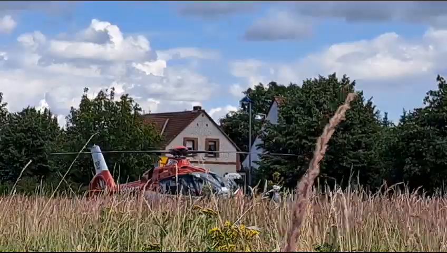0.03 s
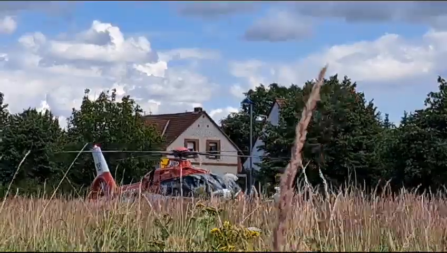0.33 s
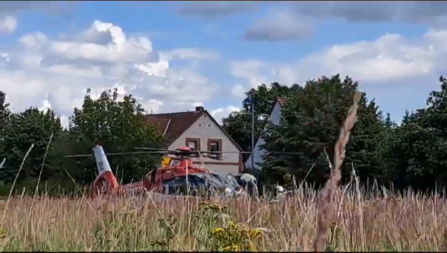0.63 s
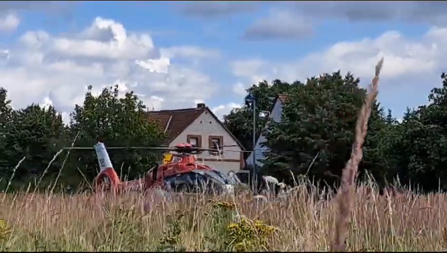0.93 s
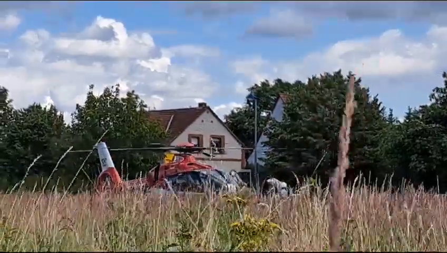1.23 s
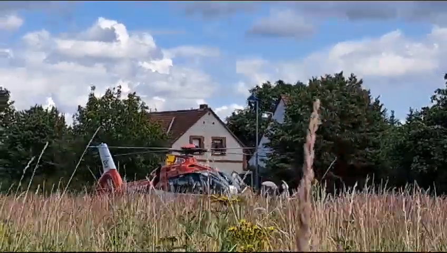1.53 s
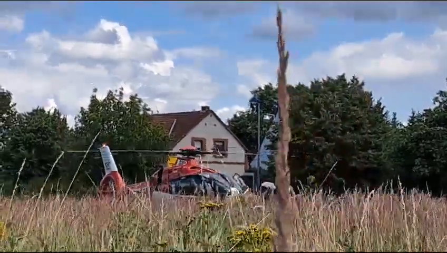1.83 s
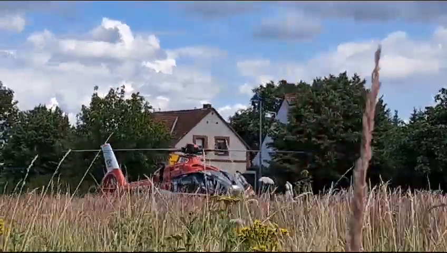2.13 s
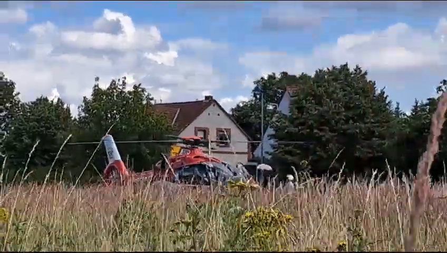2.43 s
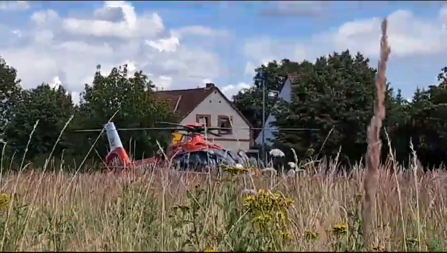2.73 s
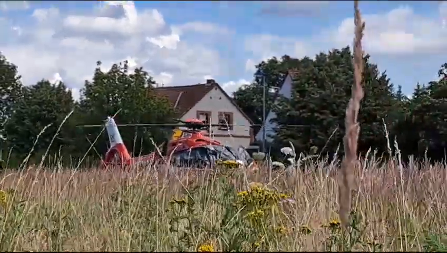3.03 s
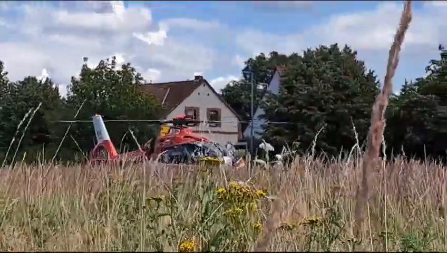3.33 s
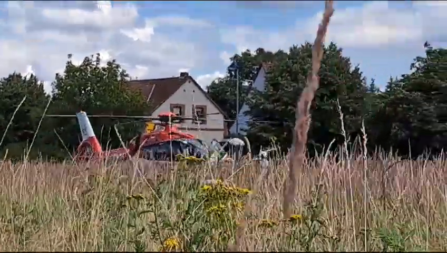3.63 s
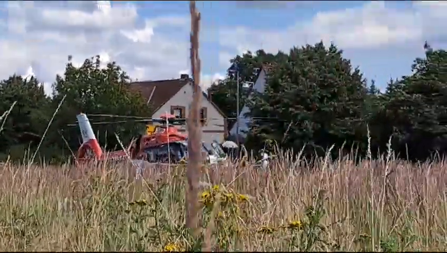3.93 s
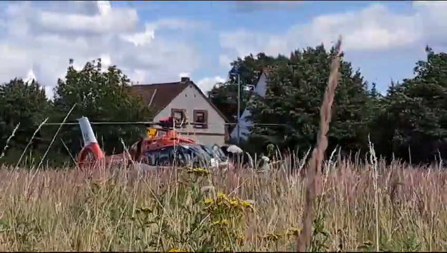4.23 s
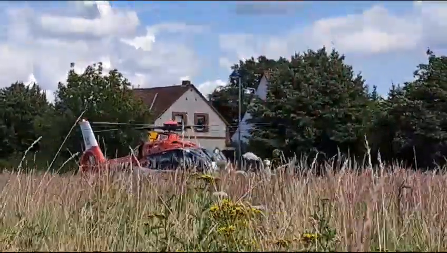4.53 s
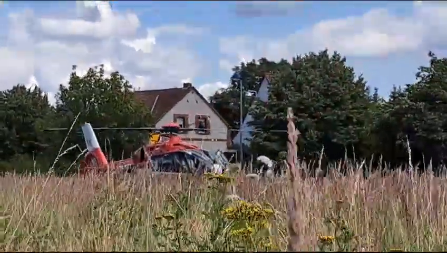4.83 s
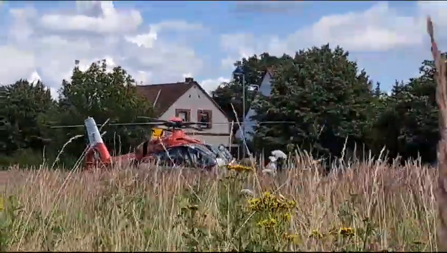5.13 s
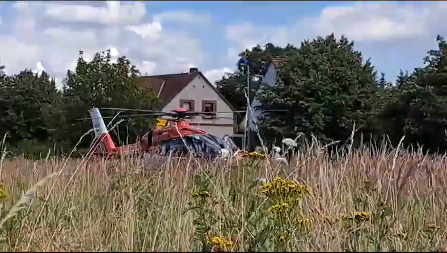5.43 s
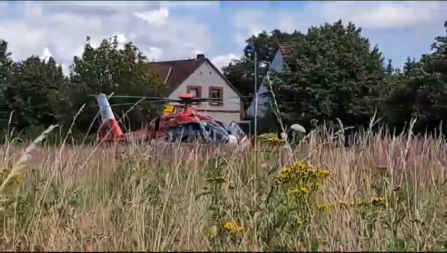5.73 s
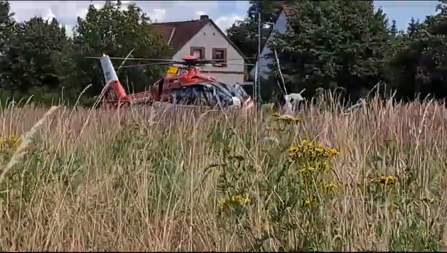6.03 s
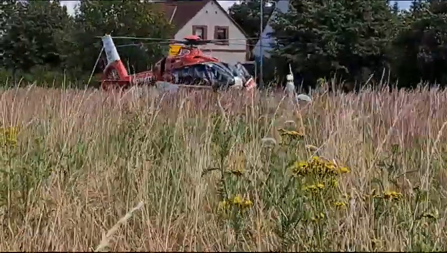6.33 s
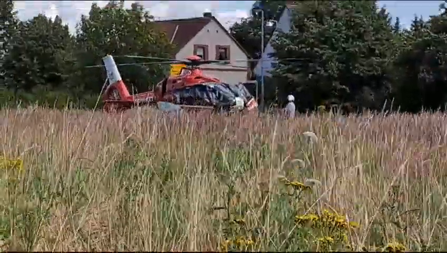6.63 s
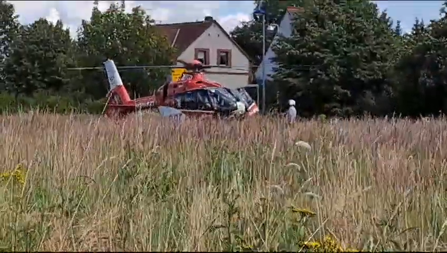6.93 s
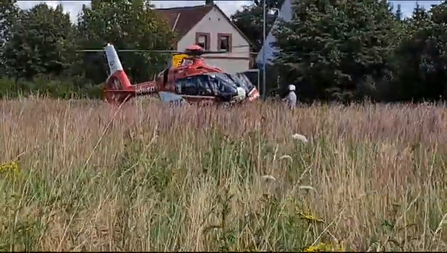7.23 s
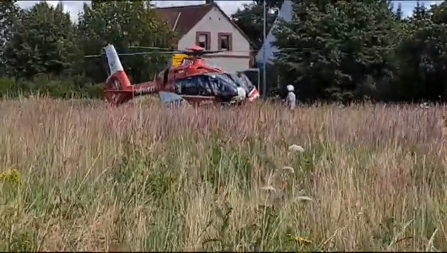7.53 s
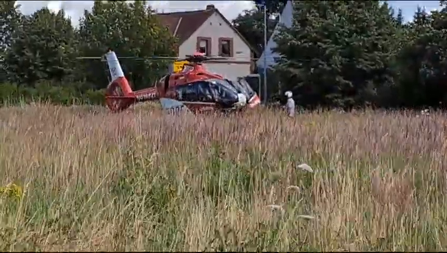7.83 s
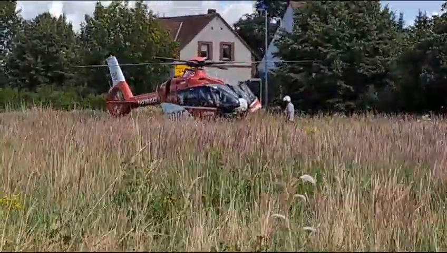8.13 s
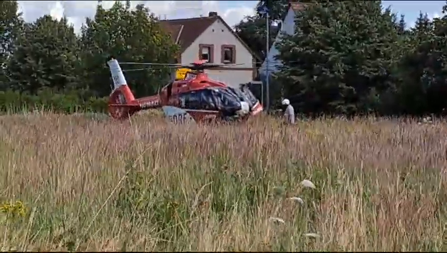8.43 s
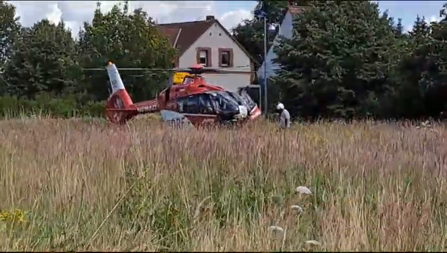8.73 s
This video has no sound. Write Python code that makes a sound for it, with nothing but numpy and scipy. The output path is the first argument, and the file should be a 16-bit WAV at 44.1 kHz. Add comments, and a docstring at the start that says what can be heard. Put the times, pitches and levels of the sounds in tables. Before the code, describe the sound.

A helicopter spools up on the far side of a meadow, its turbine giving a continuous airy hiss, a low exhaust rumble and a thin, very high whine that slowly rises. Wind buffets the microphone from the start, with the loudest thuds and sharp pops between 0.5 and 1 second, dying down by 2 seconds. Soft engine whistles come and go as the hiss grows a little. A second spell of gusts thumps and flutters from about 4 to 5.3 seconds. Tall grass close by fizzes faintly, with a few brief swishes between 5.5 and 6.5 seconds. From 5.5 seconds the exhaust roar builds and brighter whistles glide upward. The accelerating rotor chops the hiss into quick chirping pulses, clearest around 7.3 seconds, as a low hum joins. The whistling and hiss are strongest from 8 seconds until the end, near 9 seconds.

```python
"""A meadow, with a helicopter spooling up on its far side. Close by, tall grass fizzes and gusts buffet
the two ports of the microphone. Combustion gives the exhaust its roar and rumble. The compressor's
blade tone climbs over the hiss of intake and jet, while duct and gear whistles come and go. The rotor
gathers speed and chops the hiss: each passing blade throws it toward the listener."""
import sys
import numpy as np
from scipy import signal
from scipy.fft import rfft, irfft
from scipy.io import wavfile
from scipy.ndimage import uniform_filter1d

SR = 44100
rng = np.random.default_rng(int(sys.argv[2]) if len(sys.argv) > 2 else 0)


def wav_record(signal):
    """Record a signal, one row per channel, as 16-bit PCM in the file named by sys.argv[1]."""
    frames = np.transpose(np.atleast_2d(signal))
    bounded = np.clip(frames, -1, 1)
    # unit amplitude maps onto the largest positive 16-bit level
    quanta = np.round(bounded * 32767).astype(np.int16)
    wavfile.write(sys.argv[1], SR, quanta)


N = 391608
TIME = np.arange(N) / SR
USUAL_AIR_DB = -44  # reference for the swings of AIR_LEVEL
CHOP_PEAK_S = 7.28

# Strength of the turbine's air noise as the wind shifts: t/s, level/dB
AIR_LEVEL = [(0, -44), (.58, -43.5), (.85, -51), (1.8, -52.5), (2.02, -45), (2.33, -47.5), (2.82, -39.5),
             (3.15, -42.5), (3.85, -42.5), (4.8, -44), (5.13, -49), (5.5, -43), (6.4, -42.5), (6.65, -41.5),
             (7.55, -41), (8.25, -36.5), (8.55, -36.5), (8.88, -33)]
# Combustion noise: t/s, roar level/dB, rumble level/dB, casing base level/dB
COMBUSTION = [(0, -47.5, -47.5, -50.5), (1.4, -56, -51.5, -55), (2.3, -54, -46, -49.5),
              (3.5, -53, -46, -50.5), (4.4, -54.5, -45.5, -54.5), (5.1, -54.5, -43.5, -52),
              (5.5, -46.5, -47.5, -51.5), (6.6, -45, -44, -49.5), (8.88, -44, -41.5, -51)]
# Likeness of far sound at the two ports: f/Hz, coherence (clipped to 0..1 in use)
PORT_COHERENCE = [(50, 1.44), (300, .95), (700, 1.56), (1200, 0.23), (1550, 2), (2000, 0.7), (2550, .15),
                  (3300, 0.82), (4200, 0.58), (6500, 0.4), (8500, -0.4), (15000, 0.8)]
# Lead of the left port for far sound: f/Hz, phase/rad
PORT_LEAD = [(0, 0.64), (300, 0.25), (750, 1.27), (1200, 3.78), (1900, 5.72), (2500, 9), (3000, 11.88),
             (3900, 12), (4600, 14.4), (5300, 12.3), (7200, 14), (15000, 14.6)]
# Left minus right for far sound: f/Hz, level/dB
PORT_BALANCE = [(200, .5), (700, -2), (2400, -0.9), (4400, -3.5), (15000, -3)]


def amp(db):
    """Amplitude ratio: tenfold for every 20 dB."""
    return 10 ** (np.asarray(db) / 20)


def unit(x):
    """Normalisation to rms 1."""
    return x / np.sqrt(np.mean(abs(x) ** 2) + 1e-20)


def follow(rows):
    """Linear interpolation of each column of a time curve at every sample."""
    times, *columns = np.transpose(rows)
    return [np.interp(TIME, times, column) for column in columns]


def colour(points, hz):
    """Interpolation of a spectrum on a log-frequency axis."""
    f, value = np.transpose(points)
    return np.interp(np.log(hz + 1), np.log(f + 1), value)


def bell(peak_s, sigma_s):
    """Gaussian envelope, 1 at its peak."""
    return np.exp(-np.minimum(((TIME - peak_s) / sigma_s) ** 2 / 2, 50))


def drift(hz):
    """Random modulation: noise of rms 1, low-passed at hz."""
    f = np.fft.rfftfreq(N, 1 / SR)
    return unit(irfft(rfft(rng.standard_normal(N)) / (1 + (f / hz) ** 4), N))


def noise(spectrum, patchy_db, peaks=(), coherence=None, size=1024):
    """Partially coherent noise of rms 1 at the two ports; far sound unless a coherence is given."""
    hz = np.fft.rfftfreq(size, 1 / SR)
    a, b, c, d, patches = rng.standard_normal((5, N * 4 // size + 5, len(hz)), dtype=np.float32)
    patches = uniform_filter1d(patches, size=12, axis=0)  # smooth in time
    patches = unit(uniform_filter1d(patches, size=7, axis=1))  # and in frequency
    db = colour(spectrum, hz) + sum(gain * np.exp(-((hz - f) / width) ** 2) for f, width, gain in peaks)
    same = np.clip(colour(PORT_COHERENCE, hz) if coherence is None else coherence, 0, 1)
    left = a + 1j * b
    right = same * left + np.sqrt(1 - same ** 2) * (c + 1j * d)
    if coherence is None:
        side = amp(colour(PORT_BALANCE, hz) / 2)
        left, right = left * side, right / side * np.exp(-1j * colour(PORT_LEAD, hz))
    frames = np.array([left, right]) * amp(db + patchy_db * patches)
    _, sound = signal.istft(frames.swapaxes(1, 2), nperseg=size, noverlap=size * 3 // 4)
    return unit(sound[:, :N])


def tone(hz, width_hz, steady):
    """Scattering by turbulent air: a far tone arrives as a steady core plus a narrow band of noise."""
    carrier = np.exp(2j * np.pi * np.cumsum(hz) / SR)
    knots = np.arange(0, TIME[-1] + .1, 1 / 1000)
    lowpass = signal.butter(2, np.clip(width_hz / 2, 1, 400), fs=1000)
    white = rng.standard_normal((2, len(knots))) + 1j * rng.standard_normal((2, len(knots)))
    shared, own = (np.interp(TIME[:len(hz)], knots, unit(h)) for h in signal.lfilter(*lowpass, white))
    same = np.clip(colour(PORT_COHERENCE, hz), 0, 1)
    side = amp(colour(PORT_BALANCE, hz) / 2)
    scattered = np.sqrt(1 - steady ** 2)
    left = steady + scattered * shared
    right = steady + scattered * (same * shared + np.sqrt(1 - same ** 2) * own)
    ports = np.array([left * side, right / side * np.exp(-1j * colour(PORT_LEAD, hz))])
    return np.sqrt(2) * (carrier * ports).real


def grass():
    """Friction noise: tall grass fizzes faintly and brushes in a few swishes."""
    # Swishes: peak t/s, sigma/s, level/dB
    swishes = [(5.494, .025, -48), (5.836, .025, -53), (6.52, .07, -54)]
    # Spectra: f/Hz, relative level/dB
    fizz_spectrum = [(4000, -12), (8000, 2), (13500, 5), (15700, -35)]
    brush_spectrum = [(2500, -22), (4500, 3), (7000, -4), (13000, -13), (15700, -28)]
    fizz = amp(-65 + 1.1 * drift(4.4)) * noise(fizz_spectrum, patchy_db=1.5, coherence=.2)
    brush = sum(amp(db) * bell(s, sigma) for s, sigma, db in swishes) * amp(3.5 * drift(120))
    return fizz + brush * noise(brush_spectrum, patchy_db=10, coherence=.3)


def slaps():
    """Suction pulses: an eddy pulls sharply at a port, with a soft push before and a firmer one after."""
    # Single eddies: t/s, half width/s, left level/dB, right level/dB
    eddies = [(.591, .0016, -27, 1.5), (.612, 0.00094, -17, -6.5), (.652, 0.00054, -42, -17),
              (0.692, 0.00092, -41, 1), (0.89, 0.0018, -16, -27), (.957, 0.00064, -14, -12),
              (4.1176, .00084, -7.5, -12), (4.131, 0.00055, -9, -12), (4.335, .00058, -22, -14)]
    out = np.zeros((2, N))
    for s, width, left_db, right_db in eddies:
        u = (TIME - s) / width
        pulse = .17 * np.exp(-(u / 5) ** 2) - 1.1 * np.exp(-u ** 2) + .4 * np.exp(-((u - 3) / 1.3) ** 2)
        out += amp([[left_db], [right_db]]) * pulse
    return out


def wind(edge_s=0.0085, hard_db=-18.5, breeze_rattle=0.32):
    """Turbulent pressure: gusts thud on each port, and hard ones shift energy up into a flutter."""
    # Windy spells: middle t/s, sigma/s, left and right relative level/dB
    spells = [(.3, 0.85, -32.5, -28.5), (4.603, 0.72, -35.5, -42)]
    # Strong gusts: middle t/s, length/s, left and right relative level/dB
    gusts = [(0.541, 0.024, -48, -17), (0.6, 0.035, -34, -7), (0.654, 0.05, -27, -18.5),
             (0.716, 0.07, -47, -19.5), (.889, 0.055, -21, -18.5), (0.95, 0.058, -21.5, -20.5),
             (1.049, 0.11, -34, -28), (1.225, 0.049, -26.5, -36), (1.373, 0.03, -28.5, -53),
             (1.798, 0.13, -32, -31), (3.946, 0.077, -25, -22.5), (4.05, 0.1, -28.5, -37),
             (4.121, 0.068, -17, -17), (4.202, 0.035, -21, -16), (4.35, 0.066, -23.5, -25),
             (4.427, 0.078, -25.5, -27.5), (4.669, 0.045, -31.5, -28), (4.887, 0.085, -27, -25),
             (5.044, 0.054, -32, -34.5), (5.296, .065, -27.5, -27.5)]
    # Spectra of the thud and the flutter: f/Hz, relative level/dB
    thud_spectrum = [(12, -13), (30, -8), (55, 1.5), (90, -4.5), (130, -3), (200, -12), (320, -24),
                     (520, -44), (2000, -82)]
    flutter_spectrum = [(60, -9), (130, -1.5), (230, 2.5), (400, -3.5), (600, -15), (900, -25), (1400, -40),
                        (3000, -55)]
    breeze = sum(amp([[left], [right]]) * bell(s, sigma) for s, sigma, left, right in spells)
    breeze = breeze * amp(0.4 * drift(12))
    gust_power = np.zeros((2, N))
    for s, length, left, right in gusts:
        gate = (1 + np.tanh((length / 2 - abs(TIME - s)) / edge_s * 2)) / 2
        gust_power += amp([[left], [right]]) ** 2 * gate
    eddies = amp(2.5 * np.array([drift(49), drift(35)]))
    force = np.sqrt(gust_power + breeze ** 2) * eddies
    rattle_force = np.sqrt(gust_power + (breeze_rattle * breeze) ** 2) * eddies
    hardness = np.minimum(rattle_force / amp(hard_db), 2)
    thud_gain = amp(-2) * force / np.sqrt(1 + hardness ** 2)
    thud = thud_gain * noise(thud_spectrum, patchy_db=1.5, coherence=.1, size=4096)
    flutter_gain = amp(-28 + 4.4 * drift(88)) * hardness ** 1.26
    return thud + flutter_gain * noise(flutter_spectrum, patchy_db=3.5, coherence=.15)


def exhaust(hum_hz=66, hum_full_s=7.08, hum_db_per_s=11):
    """Combustion noise: the burner roars and rumbles, and the pipe's low hum swells in late."""
    # Spectra of the burner: f/Hz, relative level/dB
    roar_spectrum = [(150, -13.5), (380, -4), (520, 1), (680, 0.5), (900, 0), (1150, -7), (1400, -11),
                     (2200, -25)]
    rumble_spectrum = [(15, -30), (35, -8), (55, 3), (90, -3), (140, 0.5), (230, -3.5), (340, -11),
                       (500, -19), (900, -39)]
    roar_db, rumble_db, _ = follow(COMBUSTION)
    hum_db = -45 - hum_db_per_s * np.maximum(hum_full_s - TIME, 0)
    hum = amp(hum_db) * tone(np.full(N, hum_hz), width_hz=6.4, steady=.65)
    roar = amp(roar_db) * noise(roar_spectrum, patchy_db=1.6)
    rumble = amp(rumble_db) * noise(rumble_spectrum, patchy_db=1.5, size=4096)
    return roar + rumble + hum


def casing(air_db):
    """Radiation from the casing: a midrange band of combustion noise."""
    # Casing noise: f/Hz, relative level/dB
    spectrum = [(900, -15.5), (1300, -7.5), (1550, -3), (2150, 2), (2450, -4.5), (2800, -23.5)]
    # Its narrow dip and crest: f/Hz, width/Hz, gain/dB
    ripple = [(1280, 56, -6), (1390, 64, 2.5)]
    db = follow(COMBUSTION)[2] + 0.26 * (air_db - USUAL_AIR_DB)
    return amp(db) * noise(spectrum, patchy_db=1.5, peaks=ripple)


def jet(air_db, step_s=2.27, step_db=2.5, rise_db_per_s=.25):
    """Jet noise: a high hiss that steps up once, then grows as the engine spools up."""
    # Jet hiss: f/Hz, relative level/dB
    spectrum = [(3500, -14), (4700, 0.5), (5400, 4), (6200, 2.5), (7400, 2), (8100, -2.5), (10000, -7.5),
                (12500, -12.5), (15700, -33)]
    # Its narrow dips and crest: f/Hz, width/Hz, gain/dB
    ripple = [(4720, 84, -11), (6960, 120, -5), (7170, 130, 1)]
    step = (1 + np.tanh((TIME - step_s) / .15)) / 2
    db = -55.5 + 0.68 * (air_db - USUAL_AIR_DB) + step_db * step + rise_db_per_s * TIME
    return amp(db) * noise(spectrum, patchy_db=2.5, peaks=ripple)


def intake(air_db):
    """Duct resonance: the intake colours the hiss of the air it draws in."""
    # Intake hiss: f/Hz, relative level/dB
    spectrum = [(1900, -18), (2450, -3), (2650, 1), (3150, 0), (3700, 3.5), (4200, -2.5), (4600, -7.5),
                (4850, -8.5), (6000, -48)]
    # Resonances and notches: f/Hz, width/Hz, gain/dB
    duct_modes = [(2410, 99, -6), (2593, 62, 4.5), (2750, 60, -3), (2957, 69, 6), (3210, 60, 3.5),
                  (3420, 70, -5.5), (3525, 98, 3.5), (4155, 49, 4.5), (4330, 80, -1), (4530, 99, 7.5)]
    return amp(air_db - 1.13) * noise(spectrum, patchy_db=2, peaks=duct_modes)


def whistles(sharp_hz=90):
    """Narrow-band duct and gear tones swell, glide and fade; the narrower, the steadier the core."""
    # Whistles: peak t/s, sigma/s, f/Hz, glide/(Hz/s), width/Hz, level/dB
    lines = [(0.352, 0.21, 1660, -3, 130, -56), (0.501, .2, 3610, 57.5, 70, -48.5),
             (1.25, 0.22, 3704, 0, 170, -53.5), (2.05, .22, 6215, 230, 88.8, -63),
             (2.2, 0.22, 2000, -0.5, 403.5, -54.5), (2.7, 0.44, 2185, -0.5, 90, -51.5),
             (2.753, 0.19, 5320, 1, 664, -49.5), (2.852, 0.42, 1106, 0, 200, -52),
             (2.85, 0.49, 802, -0.5, 130, -53), (3.453, .4, 6620, 400, 130, -65),
             (3.699, 0.82, 3234, 45, 111, -48.5), (3.898, 0.64, 4510, 2, 140, -52.5),
             (4.499, 0.76, 2626, 0.5, 110, -51), (5.099, 0.29, 3650, 38, 70, -55.5),
             (5.55, .14, 3410, 59.5, 92, -43), (5.652, 0.25, 3050, 130, 119, -41),
             (5.905, .16, 4300, -0.5, 40, -55), (6.3, 0.23, 3130, 90.5, 120, -40),
             (6.321, .17, 3470, 50.5, 60, -42), (6.58, .16, 4670, -1, 40.5, -53.5),
             (6.943, 0.27, 9260, 601, 160, -57.5), (7.45, 0.56, 4930, -1, 76, -56),
             (7.69, .006, 3150, 0, 200, -36), (7.964, .1, 4000, 2, 160, -41.5),
             (8.099, .5, 2040, -5, 160, -50.5), (8.2, 0.24, 2480, 99.5, 130, -52),
             (8.219, .09, 3197, 1.5, 200, -37), (8.45, 0.43, 10500, 1050, 160, -60),
             (8.599, 0.23, 2870, 251, 130, -45.5), (8.55, 0.25, 4170, 177.5, 80, -46),
             (8.477, .1, 3750, 120.5, 50, -38), (8.753, 0.0029, 3890, 0, 60, -30),
             (8.82, .12, 3830, 300, 55, -38.5)]
    out = np.zeros((2, N))
    for s, sigma, hz, glide, width_hz, db in lines:
        on = abs(TIME - s) < 4 * sigma
        steady = 0.91 * np.exp(-(width_hz / sharp_hz) ** 2)
        out[:, on] += amp(db) * bell(s, sigma)[on] * tone(hz + glide * (TIME[on] - s), width_hz, steady)
    return out


def compressor(air_db, fade_hz=13380, fade_db=-18):
    """Blade-passing tone: it rises with speed and sinks into the hiss as a line an octave below grows."""
    # Compressor blade tone: t/s, f/Hz
    blade_pitch = [(0, 11480), (2, 12360), (3.7, 13260), (6, 14230), (7.3, 14530), (8.88, 15050)]
    hz = follow(blade_pitch)[0] * (1 + 0.000374 * drift(11))
    faded = (1 + np.tanh((hz - fade_hz) / 110)) / 2
    db = -60.5 + 0.53 * (air_db - USUAL_AIR_DB) + fade_db * faded
    blades = amp(db + 3.4 * drift(13)) * tone(hz, width_hz=48, steady=.92)
    octave_below = amp(-75 + 1.8 * TIME) * tone(hz / 2, width_hz=65, steady=.3)
    return blades + octave_below


def blade_pulses(one_pass_s=7.236, sharpness=6):
    """Phase as the integral of rate: a pulse of height 1 for each passing rotor blade."""
    # Rotor blade-passing rate: t/s, f/Hz
    passing_rate = [(0, 3.352), (8.88, 12.836)]
    passes = np.cumsum(follow(passing_rate)[0]) / SR
    passes -= np.interp(one_pass_s, TIME, passes)
    return np.exp(sharpness * (np.cos(2 * np.pi * passes) - 1))


def chirps(hz=3200):
    """Pulse modulation: around the deepest chop, an intake whistle arrives in one burst per blade."""
    bursts = bell(CHOP_PEAK_S, .53) * (0.2 + blade_pulses())
    return amp(-38) * bursts * tone(np.full(N, hz), width_hz=240, steady=.52)


def rotor_chop():
    """Amplitude modulation, in dB: each blade throws the hiss toward the listener."""
    depth_db = 0.3 * TIME + 7 * bell(CHOP_PEAK_S, .26)
    return depth_db * (blade_pulses() - .3)


def turbine():
    """Common modulation: the rotor chops air noise and whistles, and wind on the way makes them flicker."""
    air_db = follow(AIR_LEVEL)[0]
    chop_db, flicker_db = rotor_chop(), drift(29)
    return (amp(.17 * chop_db + .5 * flicker_db) * casing(air_db)
            + amp(.74 * chop_db + .97 * flicker_db) * intake(air_db)
            + amp(.55 * chop_db + .38 * flicker_db) * jet(air_db)
            + amp(.84 * chop_db + 1.1 * flicker_db) * whistles()
            + chirps() + compressor(air_db))


def scene():
    """Superposition of the far helicopter and the nearby grass and wind."""
    return turbine() + exhaust() + grass() + wind() + slaps()


def record(dry, open_s=.068, cutoff_hz=15750):
    """Clipping and band-limiting: the microphone opens, overloads at full scale and loses the top treble."""
    opening = np.clip((TIME - open_s) / .003, .004, 1)
    lowpass = signal.firwin(2047, cutoff_hz, window=("kaiser", 9), fs=SR)
    return signal.oaconvolve(np.clip(dry, -1, 1) * opening, lowpass[None], "same")


dry = scene()
out = record(dry)
wav_record(out)
```